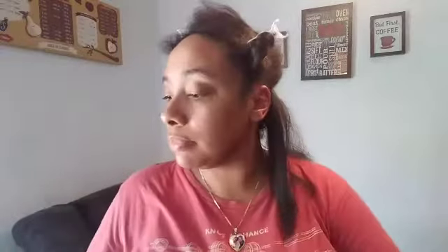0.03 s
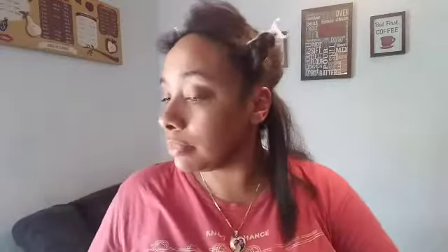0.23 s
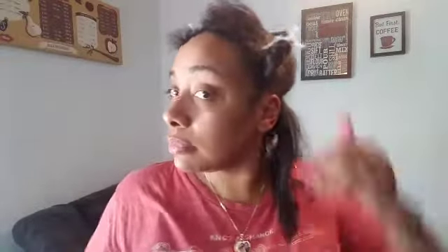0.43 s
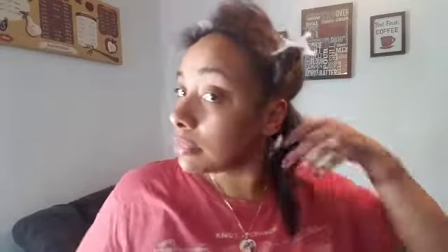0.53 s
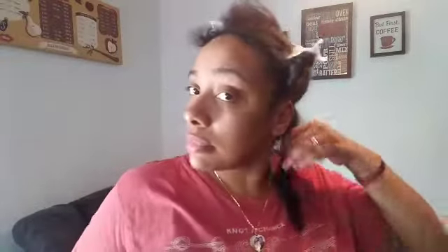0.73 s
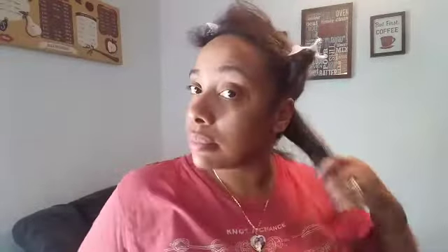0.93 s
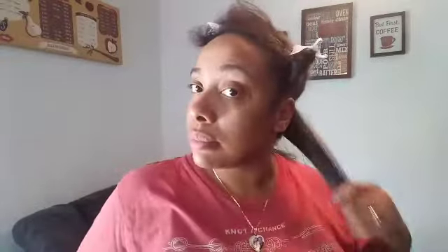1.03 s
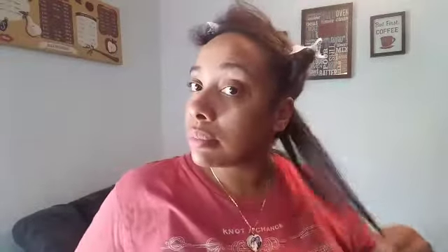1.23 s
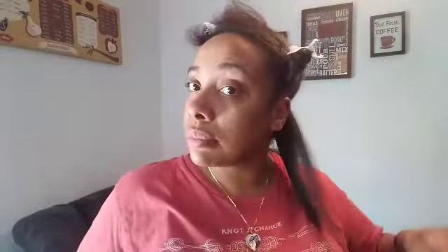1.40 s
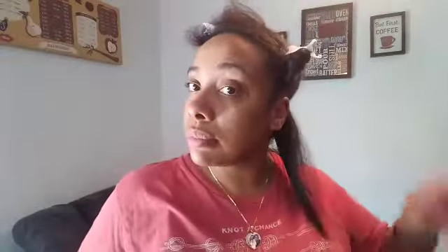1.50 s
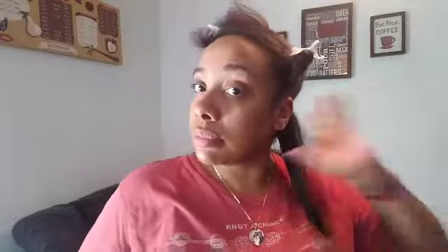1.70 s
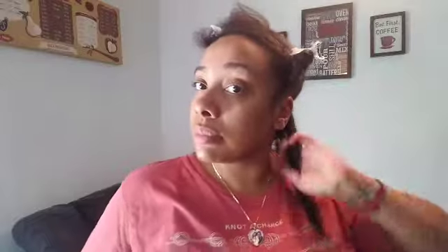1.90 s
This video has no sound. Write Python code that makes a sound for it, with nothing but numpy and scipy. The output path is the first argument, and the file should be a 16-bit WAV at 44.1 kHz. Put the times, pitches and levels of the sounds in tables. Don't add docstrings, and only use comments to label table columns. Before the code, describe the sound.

One hard plastic clack on a tabletop after soft knocks, then small bounces and a dry tick

```python
import sys
import numpy as np
from scipy import signal
from scipy.fft import rfft, irfft
from scipy.io import wavfile
from scipy.ndimage import uniform_filter1d

SR = 44100
rng = np.random.default_rng(int(sys.argv[2]) if len(sys.argv) > 2 else 0)


def file_out(sig):
    cols = np.atleast_2d(sig).T
    lim = np.clip(cols, -1, 1)
    pcm = np.round(lim * 32767).astype(np.int16)
    wavfile.write(sys.argv[1], SR, pcm)


def gain_from_db(level_db):
    decades = np.asarray(level_db, float) / 20
    return 10 ** decades


N = 85995

# hz, likeness_0_to_1
EAR_LIKENESS = [(60, .92), (130, .95), (290, .85), (640, .57), (1410, .05), (3100, 0), (15000, 0)]
HISS_EDGE_HZ = 15550


def evened(x):
    return x / np.sqrt(np.mean(x ** 2) + 1e-20)


def read(points, hz):
    f, value = np.transpose(points)
    return np.interp(np.log(hz + 1), np.log(f + 1), value)


def add(mix, s, sound):
    part = mix[max(round(s * SR), 0):][:len(sound)]
    part += sound[:len(part)]


def coloured(x, points):
    hz = np.fft.rfftfreq(x.shape[-1], 1 / SR)
    return irfft(rfft(x) * gain_from_db(read(points, hz)), x.shape[-1])


def struck(hits, modes, contact_s, tilt_db, scatter_db, detune):
    out, t = np.zeros(N), np.arange(12000) / SR
    hz, db, t60 = np.transpose(modes)[:, :, None]
    rise = np.sin(np.pi / 2 * np.minimum(t / contact_s, 1))
    draws = rng.standard_normal((len(hits), 2, len(modes), 1))
    for (s, peak_db, bright), (level_draw, pitch_draw) in zip(hits, draws):
        octaves = np.log2(hz / hz[0])
        level = db + tilt_db * (bright - .5) * octaves + scatter_db * level_draw
        tones = np.sin(2 * np.pi * hz * (1 + detune * pitch_draw) * t)
        ring = -(gain_from_db(level - 60 * t / t60) * tones).sum(0) * rise
        add(out, s, gain_from_db(peak_db) * ring / abs(ring).max())
    return out


def shell_clack():
    # start_s, peak_db, brightness_0_to_1
    clack_hits = [
        (.0005, -41.5, 0.05),
        (.3065, -10.5, 0.87),
        (.3215, -30.5, 0.51),
    ]
    # pitch_hz, level_db, t60_s
    shell_modes = [(410.16, -13, 0.0522), (489.92, -10, 0.1385), (605.13, -7, 0.03109),
                   (715.93, 5.5, 0.014744), (827.78, -5.5, .05), (868.84, -6.5, 0.046),
                   (971.78, -7, 0.04029), (1061, -26.5, 0.029), (1528.9, -7, 0.03715),
                   (1617.3, -14, 0.03552), (1978.1, -12, 0.04307), (2508.9, -17, 0.02784),
                   (3060.3, -15.5, 0.017557), (3492.9, -21.5, 0.020515)]
    null_hz, null_width_hz = 1323.4, 250.8
    notch = signal.iirnotch(null_hz, null_hz / null_width_hz, SR)
    return signal.lfilter(*notch, struck(clack_hits, shell_modes, 0.0010878, 6, 0, 0))


def rocking_bounces():
    # start_s, peak_db, brightness_0_to_1
    bounce_hits = [
        (.330, -30, 0.98),
        (.3445, -31.5, 0.23),
        (.3548, -30.5, 0.54),
        (.369, -32.5, 1),
        (.3851, -23, 0.37),
        (.4005, -30, 0.46),
    ]
    # pitch_hz, level_db, t60_s
    rocking_modes = [(397.6, -6, 0.02809), (494.94, -8.5, 0.06525), (643.45, -6, 0.03075),
                     (807.65, 2, 0.04306), (1000, -6, 0.01773), (1458.2, -9.5, 0.03648),
                     (2057.4, -12.5, 0.03226), (3103.4, -25, 0.01049)]
    return struck(bounce_hits, rocking_modes, 0.0009901, 10.133, 2.873, 0.01792)


def table_knocks():
    # start_s, peak_db, brightness_0_to_1
    knock_hits = [
        (.2214, -26.5, 0.46),
        (.2305, -40.5, 0.54),
        (.2358, -31.5, 0.08),
        (.251, -48.5, 0.5),
        (.263, -55, 0.4),
        (.280, -54.5, 0.6),
        (.312, -37.5, 0.37),
    ]
    # pitch_hz, level_db, t60_s
    table_modes = [(129.45, -11, 0.05383), (190.82, -5.5, 0.0707), (241.99, -1.5, 0.03079),
                   (392.55, -12, 0.06172), (478.42, -14.5, 0.0419)]
    return struck(knock_hits, table_modes, 0.005177, 17.47, 1, 0.0128)


def light_nudges():
    # start_s, peak_db, brightness_0_to_1
    nudge_hits = [
        (.043, -46, 0.49),
        (.0675, -43.5, 0.49),
        (.087, -40.5, 0.08),
        (.1165, -47, 0.87),
        (.124, -44, 0.99),
        (.132, -47.5, 0.6),
    ]
    # pitch_hz, level_db, t60_s
    nudged_modes = [(171.34, -3.5, 0.05536), (375.16, 0.5, 0.03904), (489.63, -4, 0.0576),
                    (793.4, -8.5, 0.02265)]
    return struck(nudge_hits, nudged_modes, 0.00309, 12.34, 0.909, 0.01614)


def landing_thump():
    hit = (.309, -41, .5)  # s, dB, brightness
    mode = (69.55, 0, 0.2114)  # Hz, dB, t60 s
    return struck([hit], [mode], 0.006088, 0, 0, 0)


def tine_ting():
    start_s, peak_db = .3064, -35.5
    hits = [(start_s, peak_db, .5), (start_s + 0.0022, peak_db - 6.5, .5)]
    mode = (11478, 0, 0.00578)  # Hz, dB, t60 s
    return struck(hits, [mode], 0.000213, 0, 0, 0)


def ticks():
    # start_s, peak_db, length_s, low_edge_hz
    tick_hits = [
        (0.2143, -38.5, 0.0077, 1171),
        (0.2192, -41.5, 0.0024, 1207),
        (0.25, -44, .008, 1000),
        (0.307, -28, .004, 4366),
        (0.4867, -30, .003, 2542),
        (1.872, -55, 0.0029, 8140),
    ]
    # hz, level_db_per_hz
    edge_colour = [(1000, 19.5), (3600, 4.5), (7200, -6.5), (9000, -4.5), (10300, -7), (13000, -10),
                   (15300, -9.5), (16500, -51)]
    contacts, lead = 40, 100
    out = np.zeros((2, N))
    draws = rng.random((len(tick_hits), 2, 2, contacts))
    for (s, peak_db, length, low_hz), draw in zip(tick_hits, draws):
        cut = signal.butter(3, np.clip(low_hz, 200, 12000), "high", fs=SR)
        for ear, (u, sign) in enumerate(draw):
            train = np.zeros(1024)
            at = lead + (u * length * SR).astype(int)
            np.add.at(train, at, gain_from_db(-11 - 9.443 * u) * np.sign(sign - .5))
            train[lead] = -1
            burst = signal.lfilter(*cut, coloured(train, edge_colour))
            add(out[ear], s - lead / SR, gain_from_db(peak_db) * burst / abs(burst).max())
    return out


def slides():
    # start_s, length_s, level_db
    strokes = [
        (0.072, 0.1143, -64),
        (0.2138, 0.03804, -51),
        (0.241, 0.04307, -53),
        (0.318, 0.1168, -51.5),
        (0.485, 0.07563, -58),
        (1.873, 0.05267, -72.5),
    ]
    # hz, level_db_per_hz
    friction_colour = [(710, -23.5), (1200, -3.5), (1520, -8.5), (2060, -13), (5900, -23.5), (7490, -33),
                       (13300, -20.5), (15200, -31.5), (16000, -23.5)]
    slips_per_s, spread_db = 3000, 4.5
    force = gain_from_db(spread_db * np.minimum(rng.exponential(1, (2, N)), 3))
    happens = rng.random((2, N)) < slips_per_s / SR
    slips = force * happens * rng.choice([-1, 1], (2, N))
    stroke = np.zeros(N)
    for s, length, db in strokes:
        u = np.arange(0, 1, 1 / (length * SR))
        add(stroke, s, gain_from_db(db) * np.sin(np.pi * u ** 0.322) ** .7)
    colour = friction_colour[:-1] + [(HISS_EDGE_HZ + 300, -60)]
    return stroke * evened(coloured(slips, colour))


def placed(x, pan_db):
    # delay_s, level_db
    wall_echoes = [(.0022, -5), (.0047, -11), (.0083, -20), (0.0135, -11)]
    spacing_s = .00012
    taps = np.zeros((2, 1200))
    for k, (delay, db) in enumerate([(0.000173, 0)] + wall_echoes):
        side = (-1) ** k * (k > 0) * 3 * spacing_s
        taps[0, round((delay + spacing_s + max(side, 0)) * SR)] += gain_from_db(db + pan_db / 2)
        taps[1, round((delay + max(-side, 0)) * SR)] += gain_from_db(db - pan_db / 2)
    return signal.fftconvolve(x[None], taps, axes=1)[:, :N]


def room(x):
    # hz, t60_s
    room_decay = [(60, 0.383), (250, 0.4647), (700, 0.44916), (2000, 0.44244), (3200, 0.3849),
                  (6000, 0.4203), (12000, 0.3862)]
    at = np.arange(120, 30000, 20) + rng.integers(0, 20, (2, 1494))
    taps = np.zeros((2, 30100))
    np.put_along_axis(taps, at, rng.choice([-1., 1.], at.shape), 1)
    hz, t, z = signal.stft(taps, SR, nperseg=256)
    same = np.clip(read(EAR_LIKENESS, hz), 0, 1)[:, None]
    z = np.array([z[0], same * z[0] + np.sqrt(1 - same ** 2) * z[1]])
    decay = gain_from_db(-60 * t / read(room_decay, hz)[:, None])
    tail = signal.istft(z * decay, SR, nperseg=256)[1]
    return signal.fftconvolve(x[None], tail / np.linalg.norm(tail[0]), axes=1)[:, :N]


def room_air():
    # time_s, level_db
    tone_swell = [(0, 12), (.06, 8.5), (.2, 12), (.5, 5.5), (.65, 4), (.9, 3.5), (1.2, 2.5), (1.7, 2.5),
                  (1.95, 3.5)]
    # hz, share
    swell_share = [(150, 0.83965), (700, 1.2014), (2000, 0.7407), (6000, 0.684)]
    # hz, level_db_per_hz
    air_colour = [(15, -6.5), (50, -14.5), (150, -8), (400, -13), (1000, -20.5), (3300, -31.5), (7500, -42),
                  (14500, -36)]
    # pitch_hz, width_hz, level_db
    air_peaks = [(196.35, 29.76, 7), (236.11, 9.39, 6), (396.71, 57.63, 4), (2821.7, 259.2, 4.5),
                 (4092.3, 300, -0.5)]
    frames, hz = N // 256 + 5, np.fft.rfftfreq(1024, 1 / SR)
    a, b, c, d, patches = rng.standard_normal((frames, 513, 5)).T
    patches = uniform_filter1d(patches, size=8, axis=0)
    patches = evened(uniform_filter1d(patches, size=10, axis=1))
    same = np.clip(read(EAR_LIKENESS, hz), -1, 1)[:, None]
    left = a + 1j * b
    z = np.array([left, same * left + np.sqrt(1 - same ** 2) * (c + 1j * d)])
    swell = np.interp(np.arange(frames) * 256 / SR, *np.transpose(tone_swell))
    level_db = 0.746 * patches + read(swell_share, hz)[:, None] * swell
    air = signal.istft(z * gain_from_db(level_db), nperseg=1024, noverlap=768)[1][:, :N]
    f = np.fft.rfftfreq(N, 1 / SR)
    bumps = sum(db * np.exp(-((f - top_hz) / width) ** 2) for top_hz, width, db in air_peaks)
    shape = gain_from_db(read(air_colour, f) + bumps - 17 * (f > HISS_EDGE_HZ))
    air = irfft(rfft(air) * shape, N) / np.sqrt(np.mean(shape ** 2)) / np.std(air[:, N // 2:])
    return gain_from_db(-59) * air


def mains_hum():
    hum_hz, width_hz = 119.1, 15.287
    t = np.arange(N) / SR
    r = np.exp(-np.pi * width_hz / SR)
    waver = signal.lfilter([1], [1, -r], rng.standard_normal((2, N)))
    waver = signal.lfilter([1 - r], [1, -r], waver)
    drift = 1.4325 + evened(waver[0]) + 1j * evened(waver[1])
    hum = evened((drift * np.exp(2j * np.pi * hum_hz * t)).real)
    return gain_from_db(-64.5) * hum + gain_from_db(-72.5) * np.sin(np.pi * hum_hz * t)


def scene():
    clack, bounce = shell_clack(), rocking_bounces()
    knock = table_knocks() + light_nudges()
    tick = ticks() + tine_ting()
    send = gain_from_db(-3) * clack + gain_from_db(-10.5) * bounce + gain_from_db(-15) * knock + gain_from_db(-6) * ticks()[0]
    shell = placed(clack, -0.852) + bounce * gain_from_db(np.array([[-1.5], [1.5]]))
    tick = tick * gain_from_db(np.array([[1], [-1]]))
    background = room_air() + mains_hum()
    return shell + knock + landing_thump() + tick + slides() + room(send) + background


def band_limit(x):
    return signal.sosfilt(signal.butter(12, 16490, fs=SR, output="sos"), x)


def record(dry):
    mix = dry - .0005
    return band_limit(mix)


dry = scene()
out = record(dry)
file_out(out)
```